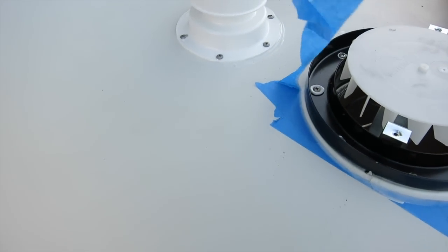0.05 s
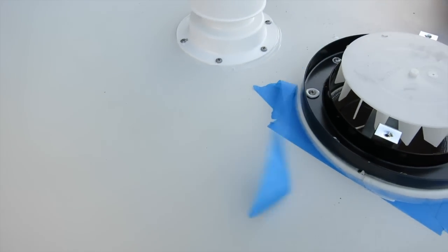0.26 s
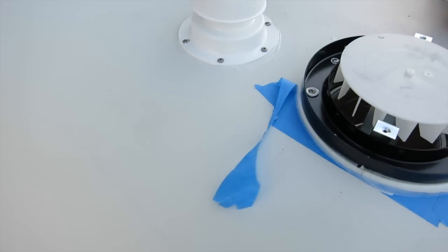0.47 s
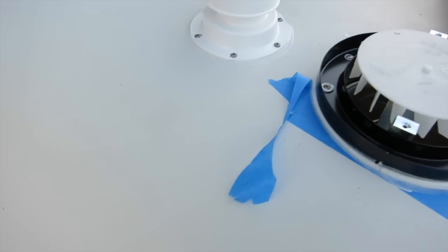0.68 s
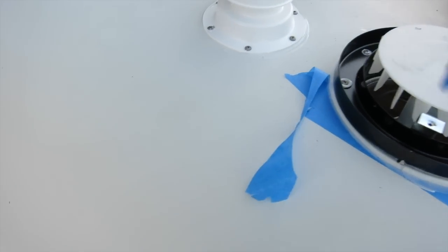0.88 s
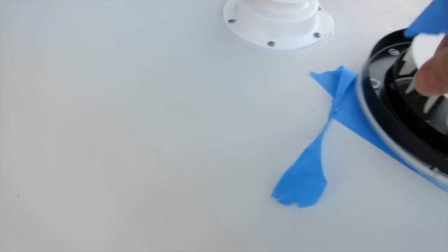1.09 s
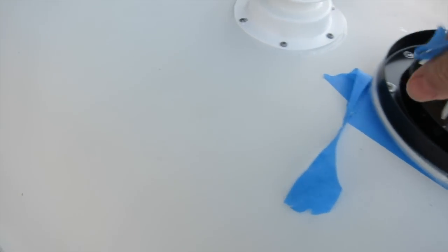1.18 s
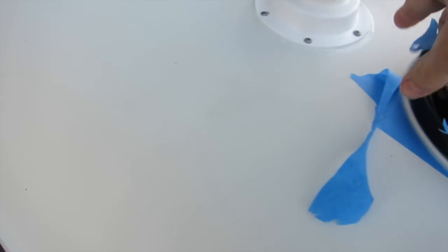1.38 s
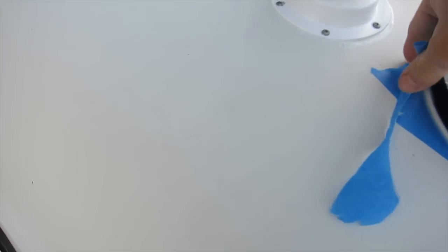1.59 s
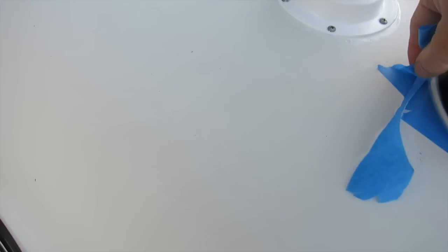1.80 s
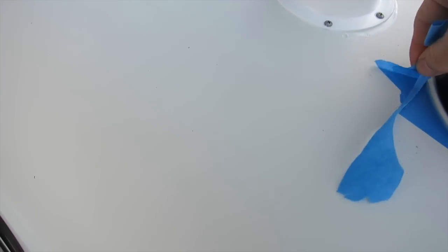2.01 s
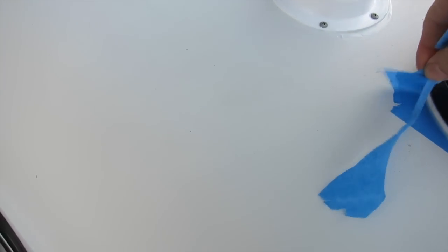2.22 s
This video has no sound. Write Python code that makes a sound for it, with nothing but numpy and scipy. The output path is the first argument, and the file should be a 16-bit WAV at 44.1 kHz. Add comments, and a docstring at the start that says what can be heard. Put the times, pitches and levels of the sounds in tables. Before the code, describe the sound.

Close, crisp crackle of paper tape peeled off a smooth panel and crumpled, quiet outdoors

```python
"""Outdoors, close to a camera with two microphone ports: masking tape is pulled off a smooth roof panel,
snaps free, flops down and is crumpled in a hand. Snaps, and fingers on the plastic lid, are coloured bursts;
the rustle is dense random slips. Behind it a regular knocking off to the left is delayed ringing noise,
a dull bump and low buffeting come early, and distant hum and hiss are one broad, shaped noise."""
import sys
import numpy as np
from scipy import signal
from scipy.fft import rfft, irfft, next_fast_len
from scipy.io import wavfile
from scipy.ndimage import uniform_filter1d, map_coordinates

SR = 44100
rng = np.random.default_rng(int(sys.argv[2]) if len(sys.argv) > 2 else 0)


def generate_wav(signal):
    """Clip the signal to [-1, 1] and save it as 16-bit WAV at the path in sys.argv[1]."""
    frames = np.transpose(np.atleast_2d(signal))
    scaled = np.clip(frames, -1, 1) * 32767
    pcm = np.round(scaled).astype(np.int16)
    wavfile.write(sys.argv[1], SR, pcm)


def volts_from_decibels(level):
    """Turn decibel levels (scalar or array-like) into linear amplitude factors."""
    exponent = np.asarray(level, float) / 20
    return 10 ** exponent


N = 99225  # samples, 2.25 s


def unit(x):
    """Scale to rms 1."""
    return x / np.sqrt(np.mean(x ** 2) + 1e-20)


def along(points, hz):
    """Read a table of (f/Hz, value) on a log frequency axis."""
    f, value = np.transpose(points)
    return np.interp(np.log(hz + 1), np.log(f + 1), value)


def curves(rows):
    """One value per sample for each column after the time."""
    t, *columns = np.transpose(rows)
    return [np.interp(np.arange(N) / SR, t, column) for column in columns]


def wobble(rate):
    """A smooth random curve with rate knots a second."""
    knots = rng.standard_normal(int(N * rate / SR) + 4)
    return map_coordinates(knots, [np.arange(N) * rate / SR])


def filtered(x, response):
    """Filter x by a complex response of frequency."""
    n = x.shape[-1]
    padded = next_fast_len(n + 4096)
    spectrum = rfft(x, padded) * response(np.fft.rfftfreq(padded, 1 / SR))
    return irfft(spectrum, padded)[..., :n]


def low_cut(f, corner):
    """First-order response that loses the lows under a corner in Hz."""
    return 1j * f / (corner + 1j * f)


def resonances(rows):
    """Response of (f/Hz, width/Hz, level/dB) resonances summed with alternating sign."""
    def response(f):
        total = 0
        for k, (centre, width, db) in enumerate(rows):
            peak = 1j * f * width / (centre * centre - f * f + 1j * f * width)
            total = total + (-1) ** k * volts_from_decibels(db) * peak
        return total
    return response


def spread(pair, alike):
    """Two unrelated signals become left and right of a given likeness."""
    def shares(hz):
        turn = np.arccos(np.clip(along(alike, hz), -1, 1)) / 2
        return np.array([np.cos(turn), np.sin(turn)])
    mid, side = filtered(pair, shares)
    return np.array([mid + side, mid - side])


def burst(ms, response, rise=0, clean=0):
    """Noise rises over a share of its time constant and dies with it, led by a clean click; coloured, peak 1."""
    u = np.arange(1, 2049) / SR * 1000 / max(ms, .05)  # time in time constants
    noise = rng.standard_normal(len(u)) * np.exp(-u) * (1 - np.exp(-u / max(rise, .001)))
    click = u == u[0]
    x = (1 - clean) * noise / np.linalg.norm(noise) + clean * click
    x = filtered(x, response)
    return x / np.abs(x).max()


def add(track, t, sound):
    """Mix a sound in at time t in seconds."""
    part = track[..., round(t * SR):][..., :sound.shape[-1]]
    part += sound[..., :part.shape[-1]]


SNAP_Q, SNAP_BROAD = 5.7, 0.46  # sharpness of the pitch; unpitched share
RISE = 0.25  # rise over length
AFTER_DB, AFTER_MS = -8, 1.1  # rattle after a snap, re the crack
CLEAN_MS = .55  # well below this length a snap is mostly one clean release
CUT, DULL_HZ = 0.33, 15100  # low cut over pitch; cracks fall off above DULL_HZ
# Creases of the tape snapping: t/s, crack peak level/dB ahead of the ports, pitch f/Hz, time constant/ms,
# thump level/dB re crack, thump centre f/Hz
CREASES = [(0.0482, -14, 10000, 0.26, -41, 2000), (0.1342, -25.5, 12500, 0.38, -27, 2300),
           (0.2229, -1.5, 12050, 1.2, -21.5, 630), (0.226, -15, 10700, 1.9, -9, 2800),
           (0.2316, -21, 9000, 2.9, -4.5, 3200), (.3186, -4, 10700, 0.17, -34, 810),
           (0.4403, -45, 11800, 1.6, 3, 1900), (.4505, -44, 4000, 0.51, 1, 2270),
           (.4565, -43.5, 8800, 0.93, -29, 2330), (.468, -48, 11650, 2.5, -25, 2300),
           (.603, -45.5, 10980, 0.66, -16, 2280), (0.6866, -28, 11600, 0.43, -37, 2300),
           (0.737, -32, 5560, 1, -36, 2300), (.785, -33, 11100, .45, -33, 2300),
           (0.8702, -30, 7550, .7, -25, 2300), (1.011, -26, 4970, 0.33, -6, 2300),
           (1.1957, -28.5, 7800, 3.1, -15, 2250), (1.2021, -17.5, 6770, 1.4, -12, 2300),
           (1.2009, -16.5, 13800, 1.6, -20, 2280), (1.206, -32.5, 11700, 1.4, -28, 2300),
           (1.2126, -30, 9000, 1.5, -5, 1310), (1.2258, -23.5, 6670, 1.3, -6, 4800),
           (1.232, -33.5, 12100, 0.84, -9.5, 2300), (1.544, -40.5, 6000, 0.62, 3, 2280),
           (1.555, -42, 12000, 0.95, -17, 2300), (1.586, -40, 9300, 0.77, -10, 2300),
           (1.937, -42, 9000, 2.2, -13, 2320), (1.9801, -5.5, 7030, 0.42, -23, 2670),
           (1.988, -33, 6500, 2.4, -40, 2330), (2.0156, -18.5, 8700, 0.22, -23, 2300),
           (2.203, -31, 9200, 0.78, -30, 2300)]


def snaps():
    """Each crease cracks at its own pitch, with a shorter or longer decay, a rattle and a broad thump."""
    out = np.zeros((2, N))
    for t, db, hz, ms, thump_db, thump_hz in CREASES:
        ring = resonances([(hz, hz / SNAP_Q, 0)])
        broad = resonances([(thump_hz, 0.53 * thump_hz, 0)])
        crack_colour = lambda f: (ring(f) + SNAP_BROAD) * low_cut(f, CUT * hz) ** 6 / (1 + (f / DULL_HZ) ** 10)
        thump_colour = lambda f: broad(f) * low_cut(f, 150)
        clean = np.exp(-(ms / CLEAN_MS) ** 2)
        for port in out:
            crack = burst(ms, crack_colour, RISE, clean)
            rattle = volts_from_decibels(AFTER_DB) * burst(AFTER_MS, crack_colour)
            thump = volts_from_decibels(thump_db) * burst(ms + 0.49, thump_colour, clean=0.62)
            add(port, t, volts_from_decibels(db) * (crack + rattle + thump))
    return out


# Fingers touching the lid: t/s, peak level/dB ahead of the ports, time constant/ms
TOUCHES = [(1.1957, -36, 1.7), (1.2022, -18.5, 0.54), (1.2053, -25.5, .8), (1.2258, -34.5, 0.46)]
# Resonances of the plastic lid: f/Hz, width/Hz, relative level/dB
LID_RING = [(684, 93, 7.5), (906, 250, 3.5), (1505, 290, 1), (2000, 190, 3.5), (2465, 200, 7),
            (3610, 270, -3), (5230, 270, 5.5)]


def finger_taps():
    """Fingers ring the lid: mostly a click, with a little noise, through the lid's resonances."""
    out = np.zeros((2, N))
    lid = resonances(LID_RING)
    for t, db, ms in TOUCHES:
        for port in out:
            add(port, t, volts_from_decibels(db) * burst(ms, lambda f: lid(f) * low_cut(f, 300) ** 2, clean=0.93))
    return out


GRAINS_PER_S, GRAIN_SPREAD_DB = 9000, 1.5
FLUTTER_DB, PATCHY_DB = 0.7, 2
EDGE_HZ, EDGE_WIDTH_HZ = 5400, 1050
# Rubbing and crinkling, ahead of flutter and ports: t/s, body level/dB, sheen level/dB
RUSTLE_LEVELS = [(0.0, -73, -59), (0.036, -77, -51), (0.056, -58, -54.5), (0.07, -62, -47),
                 (0.106, -61, -54.5), (0.128, -59, -49), (0.15, -79, -53.5), (0.18, -53, -51),
                 (0.188, -72, -59.5), (0.215, -63, -47.5), (0.25, -61.5, -61.5), (0.296, -66, -60),
                 (0.31, -63, -66), (0.34, -64, -67), (0.352, -56, -62), (0.416, -76, -70.5),
                 (0.43, -71, -74), (0.48, -72, -71), (0.494, -68, -63), (0.504, -76.5, -73),
                 (0.59, -82, -91), (0.598, -63.5, -75), (0.608, -72, -67.5), (0.648, -60, -55),
                 (0.678, -56.5, -50.5), (0.72, -54.5, -46.5), (0.76, -45.5, -43), (0.772, -53, -50),
                 (0.798, -47.5, -41.5), (0.84, -55.5, -52), (0.854, -60, -71), (0.862, -58, -55),
                 (0.885, -51.5, -54), (0.925, -49, -45), (0.969, -37.5, -37.5), (0.987, -38.5, -43.5),
                 (0.999, -42, -40), (1.035, -55, -57), (1.089, -62.5, -59.5), (1.099, -68, -78),
                 (1.131, -73, -78), (1.141, -64, -64), (1.179, -70, -64), (1.19, -55, -50),
                 (1.245, -60, -61), (1.255, -70, -69), (1.325, -71, -80), (1.357, -71, -67.5),
                 (1.437, -65.5, -66.5), (1.461, -66.5, -83), (1.515, -69, -84), (1.521, -63, -64),
                 (1.541, -60, -62), (1.567, -66, -76), (1.587, -66, -62), (1.601, -67, -70),
                 (1.657, -68, -69), (1.693, -61.5, -56.5), (1.737, -48.5, -52.5), (1.749, -63, -64),
                 (1.783, -54.5, -45.5), (1.815, -57, -59.5), (1.833, -55.5, -45), (1.915, -64.5, -67),
                 (1.943, -54.5, -56), (1.97, -58.5, -57.5), (2.03, -53.5, -57), (2.078, -51, -50.5),
                 (2.088, -45.5, -49), (2.108, -52, -51), (2.12, -44.5, -48.5), (2.13, -56.5, -56),
                 (2.156, -53.5, -54), (2.168, -47, -49.5), (2.198, -58, -52), (2.24, -53.5, -54),
                 (2.25, -48, -63)]
# Spectrum of the body: f/Hz, relative level/dB per Hz
BODY_COLOUR = [(900, -52), (1400, -13.5), (2100, -2), (2600, -8), (3400, -10.5), (4300, -1.5), (5300, 1.5),
               (6700, -2), (7600, -9.5), (9500, -16.5)]
# Spectrum of the sheen: f/Hz, relative level/dB per Hz
SHEEN_COLOUR = [(5500, -26), (7200, -7), (8500, -3), (10000, -3), (12000, -0.5), (13500, -3.5),
                (15800, -19.5), (16600, -19)]
# Lift of the middle treble band of the slips, before body and sheen are levelled: t/s, level/dB
EDGE_LIFT = [(.6, -3), (.77, 5), (.9, -2.5), (1.9, -0.5), (2.05, -7.5)]


def rustle():
    """Dense tiny slips of uneven size, in patches of shifting colour; body and sheen swell apart."""
    body_db, sheen_db = curves(RUSTLE_LEVELS)
    struck = rng.random((2, N)) < GRAINS_PER_S / SR
    size = rng.standard_normal((2, N)) * volts_from_decibels(GRAIN_SPREAD_DB * rng.standard_normal((2, N)))
    z = signal.stft(struck * size, nperseg=128)[2]
    patches = uniform_filter1d(rng.standard_normal(z.shape[1:]), size=4, axis=0)  # smooth in frequency
    patches = uniform_filter1d(patches, size=9, axis=1)  # smooth in time
    hz = np.fft.rfftfreq(128, 1 / SR)[:, None]
    t = np.arange(z.shape[2]) * 64 / SR
    edge_db = np.interp(t, *np.transpose(EDGE_LIFT)) * np.exp(-((hz - EDGE_HZ) / EDGE_WIDTH_HZ) ** 2)
    slips = signal.istft(z * volts_from_decibels(PATCHY_DB * unit(patches) + edge_db), nperseg=128)[1][:, :N]
    body = unit(filtered(slips, lambda f: volts_from_decibels(along(BODY_COLOUR, f))))
    sheen = unit(filtered(slips, lambda f: volts_from_decibels(along(SHEEN_COLOUR, f))))
    flutter = volts_from_decibels(FLUTTER_DB * (wobble(45.47) + wobble(130)))
    return flutter * (volts_from_decibels(body_db) * body + volts_from_decibels(sheen_db) * sheen)


# Likeness of the tape at the two ports: f/Hz, likeness (1 = identical)
TAPE_LIKENESS = [(1000, 1), (2000, 0.99), (3500, .98), (5500, 1), (8000, 0.98), (15000, 0.74)]
# Phase by which the left port leads for the tape, at full share: f/Hz, phase/rad
TAPE_LEAD = [(2000, 0), (6900, 0), (9000, -.55), (10700, -1.15), (12200, -1.3), (14000, -2.3),
             (16400, -3.1)]
# Left over right for the tape, at full share: f/Hz, level/dB
TAPE_TILT = [(1500, -1), (4000, 0), (8000, 2), (12000, 4), (15000, 3.5)]
# Where the tape is: t/s, share of the lead, share of the tilt
TAPE_PLACE = [(.22, 0.64, 0.94), (.31, 0.05, .3), (.5, .3, 0.56), (.75, 1.27, .3), (.95, 1.07, 0.47),
              (1.2, 1, 0.82), (1.8, 0.5, 0.79), (1.98, 0.88, 0.89), (2.1, 0.49, 0.51)]


def tape():
    """Snaps, taps and rustle reach the ports with a lead and tilt that depend on frequency and place."""
    close = spread(snaps() + finger_taps() + rustle(), TAPE_LIKENESS)
    hz, t, z = signal.stft(close, SR, nperseg=256)
    when, lead, tilt = np.transpose(TAPE_PLACE)
    phase = np.outer(along(TAPE_LEAD, hz), np.interp(t, when, lead))
    tilt_db = np.outer(along(TAPE_TILT, hz), np.interp(t, when, tilt))
    half = np.exp(.5j * phase) * volts_from_decibels(.5 * tilt_db)  # half to the left, the inverse to the right
    return signal.istft(z * np.array([half, 1 / half]), SR, nperseg=256)[1][:, :N]


KNOCK_MS = 7.6  # time constant
KNOCK_RIGHT_DB, KNOCK_LAG_MS = -7.5, 0.15  # right port re left
# Far knocks: t/s, peak level/dB at the left port
KNOCK_TIMES = [(0.2052, -29.5), (0.539, -56), (0.703, -41), (0.8737, -37.5), (1.055, -37), (1.3736, -38.5),
               (1.5424, -35), (1.7085, -37)]
# Resonances of the knocked object: f/Hz, width/Hz, relative level/dB
KNOCK_COLOUR = [(893, 900, -11.5), (1450, 295, 6.5), (2140, 130, -10.5)]


def knocking():
    """Something far to the left is tapped at about six a second, with beats missing; right is later, weaker."""
    left = np.zeros(N)
    for t, db in KNOCK_TIMES:
        add(left, t, volts_from_decibels(db) * burst(KNOCK_MS, resonances(KNOCK_COLOUR)))
    late = filtered(left, lambda hz: np.exp(-2j * np.pi * hz * KNOCK_LAG_MS / 1000))
    return np.array([left, volts_from_decibels(KNOCK_RIGHT_DB) * late])


BUMP_S, BUMP_DB, BUMP_HZ, BUMP_MS = .128, -46, 121.5, 7.2  # start, envelope peak, pitch, time to peak


def bump():
    """A soft low push among the buffeting: one sine under a swell that rises and dies."""
    u = np.clip(np.arange(N) / SR - BUMP_S, 0, None) * 1000 / BUMP_MS
    swell = np.e * u * np.exp(-u)  # peak 1
    return volts_from_decibels(BUMP_DB) * swell * np.sin(2 * np.pi * BUMP_HZ * u * BUMP_MS / 1000)


# Low buffeting, ahead of its wobble: t/s, level/dB
BUFFET_LEVEL = [(0, -53.5), (.1, -53.5), (.16, -55), (.21, -49.5), (.24, -60), (.3, -72), (2.25, -97)]
# Spectrum of the buffeting: f/Hz, relative level/dB per Hz
BUFFET_SPECTRUM = [(24, -62), (40, -29.5), (114, -4), (350, -3.5), (389, -26.5), (439, -1), (543, -12),
                   (1500, -18), (1950, -39), (3300, -120)]


def buffeting():
    """Low noise, the same at both ports, that wavers and soon dies away."""
    noise = unit(filtered(rng.standard_normal(N), lambda hz: volts_from_decibels(along(BUFFET_SPECTRUM, hz))))
    return volts_from_decibels(curves(BUFFET_LEVEL)[0] + 1.8 * wobble(29.9)) * noise


# Surroundings, ahead of a 3.5 dB lift and a slow wobble: t/s, level/dB
OUTDOOR_LEVEL = [(0.0, -52.5), (0.08, -52), (0.22, -52.5), (0.27, -64), (0.53, -66), (0.78, -61),
                 (1.05, -58), (1.46, -58), (1.75, -55), (2.02, -57), (2.25, -56)]
# Spectrum of hum and hiss: f/Hz, relative level/dB per Hz
HUM_COLOUR = [(24, -65), (45, -39.5), (90, -32), (130, -17), (165, -18.5), (196, -4.5), (240, -11.5),
              (340, -7.5), (700, -7.5), (1000, -12.5), (1500, -10.5), (2300, -14), (3200, -25), (6200, -30),
              (12800, -26.5), (15900, -37), (16600, -45)]
# Likeness of the surroundings at the two ports: f/Hz, likeness (1 = identical)
HUM_LIKENESS = [(60, 0.94), (130, 1), (290, 1), (640, 0.83), (1410, 0.19), (3100, 0.72), (6820, 0.79),
                (15000, 0.3)]
# Phase by which the left port leads for the surroundings: f/Hz, phase/rad
HUM_PHASE = [(400, 0.094), (1300, -0.78), (3000, -0.035), (6000, 0.018)]


def outdoors():
    """Far traffic and air as one broad noise, shaped by frequency and slowly swelling."""
    noise = filtered(rng.standard_normal((2, N)), lambda hz: volts_from_decibels(along(HUM_COLOUR, hz)))
    hum = unit(spread(noise, HUM_LIKENESS))
    hum = filtered(hum, lambda hz: np.exp(np.outer([.5j, -.5j], along(HUM_PHASE, hz))))
    return volts_from_decibels(curves(OUTDOOR_LEVEL)[0] + 3.5 + 1.32 * wobble(7.59)) * hum


def scene():
    """Tape up close, then knocking, bump, buffeting and the far surroundings."""
    return tape() + knocking() + bump() + buffeting() + outdoors()


def top_cut(x):
    """Nothing passes above the cut-off."""
    return signal.sosfilt(signal.butter(12, 16780, fs=SR, output="sos"), x)


def record(dry):
    """The camera clips the loudest peaks, then limits the band steeply at 16 kHz."""
    clipped = np.clip(dry, -.97, .97)
    mix = filtered(clipped, lambda hz: 1 / (1 + (hz / 16000) ** 150))
    return top_cut(mix)


dry = scene()
out = record(dry)
generate_wav(out)
```